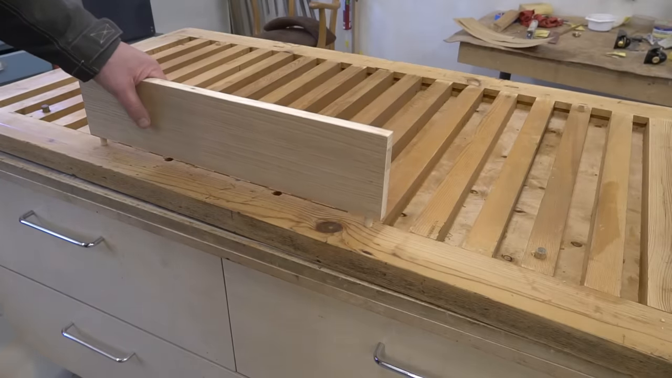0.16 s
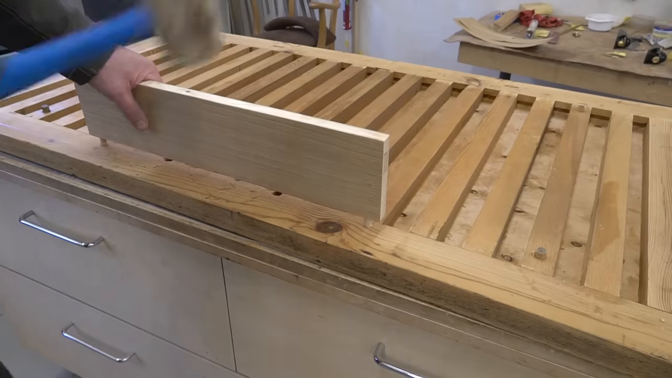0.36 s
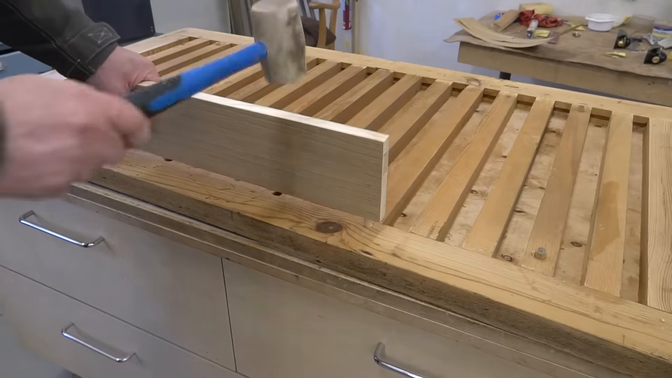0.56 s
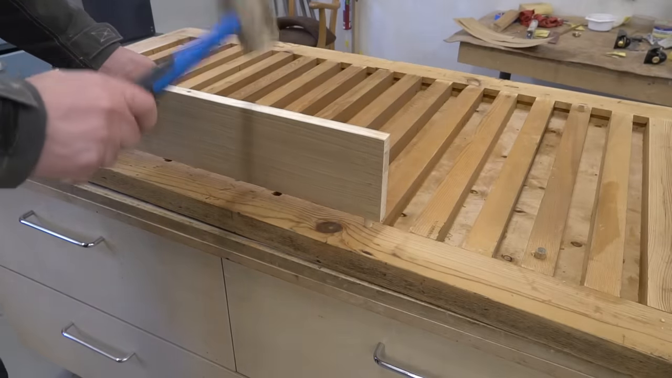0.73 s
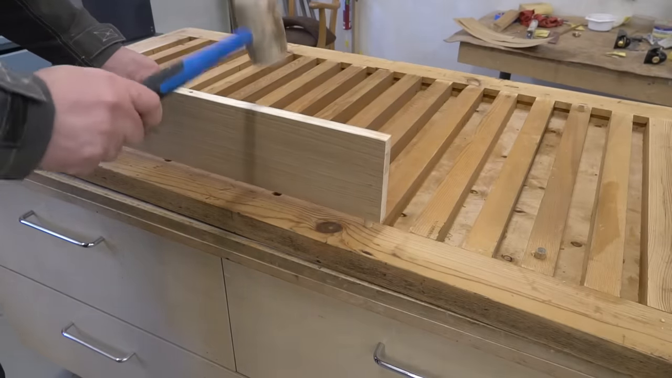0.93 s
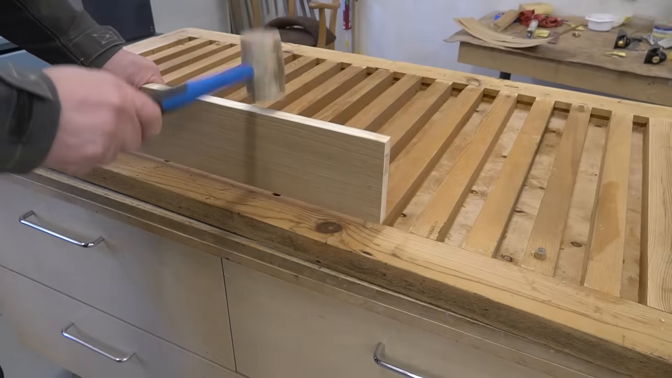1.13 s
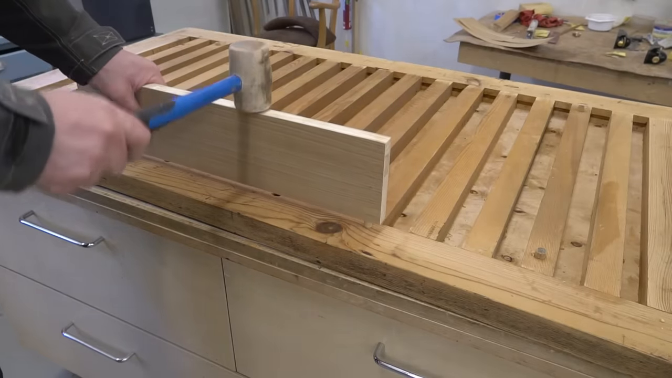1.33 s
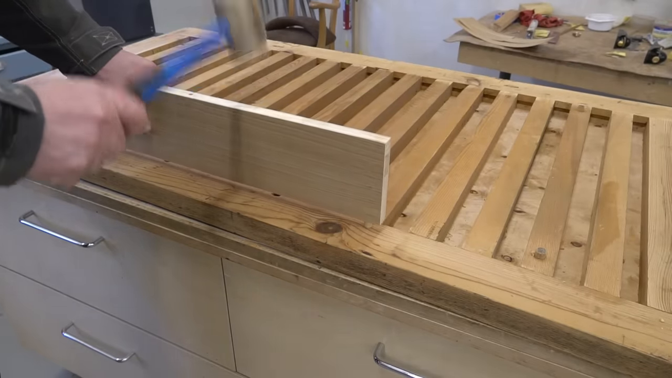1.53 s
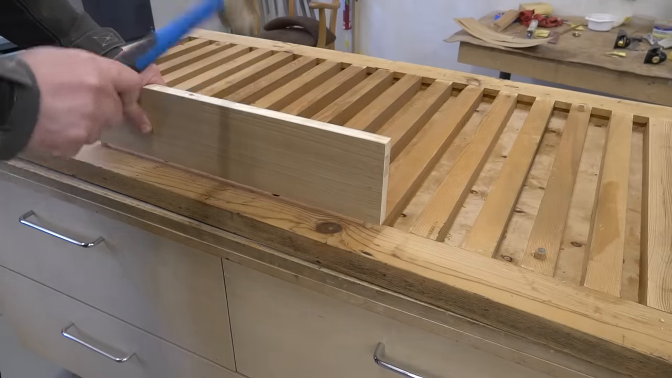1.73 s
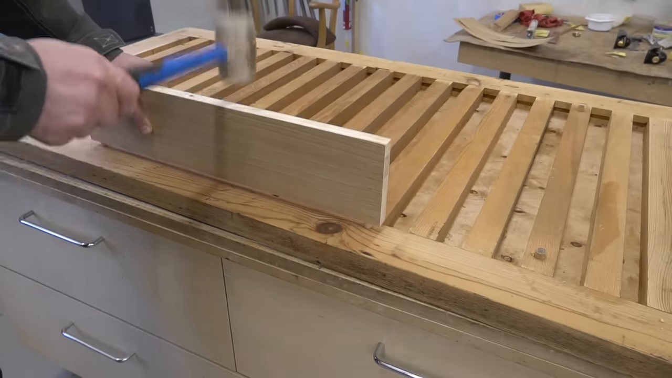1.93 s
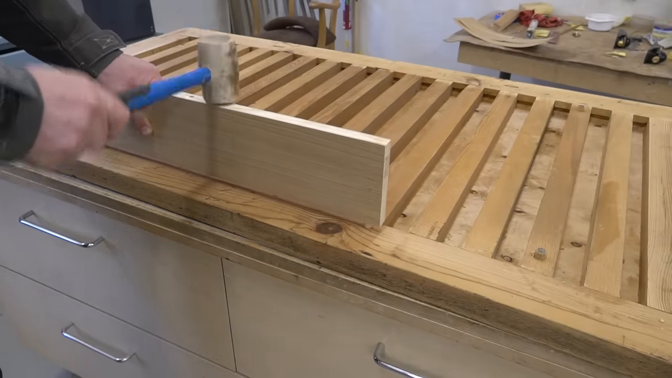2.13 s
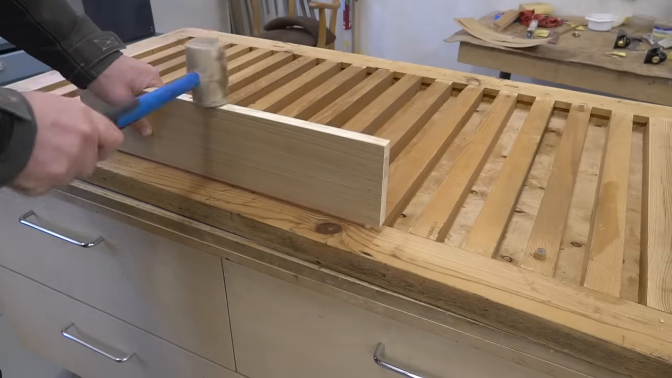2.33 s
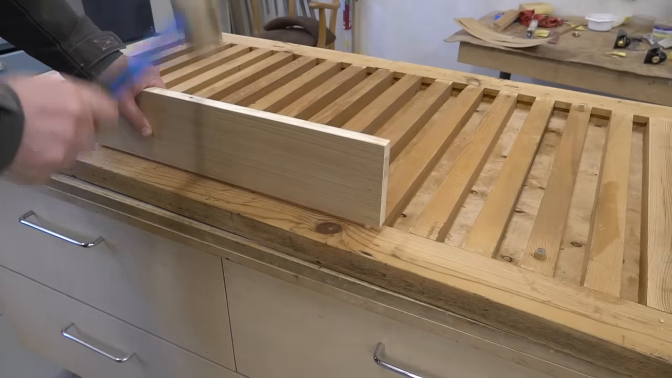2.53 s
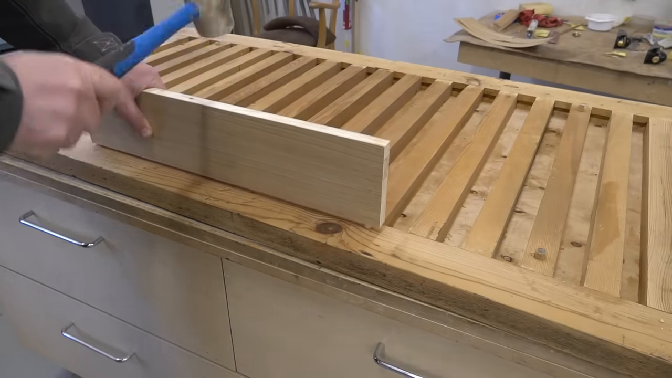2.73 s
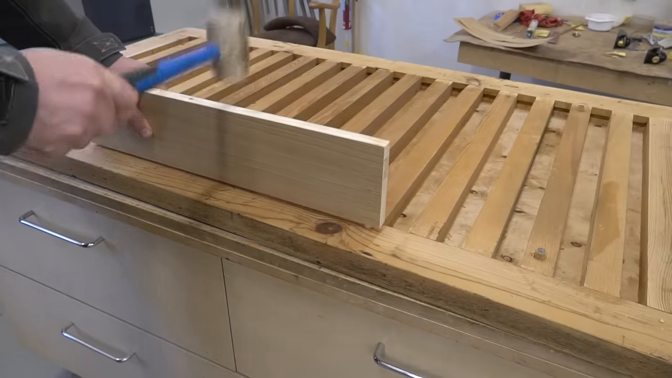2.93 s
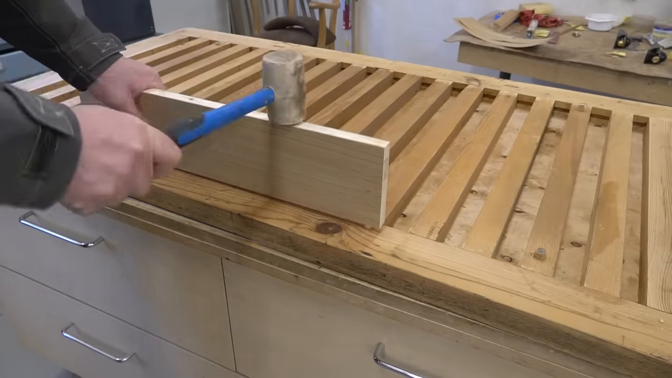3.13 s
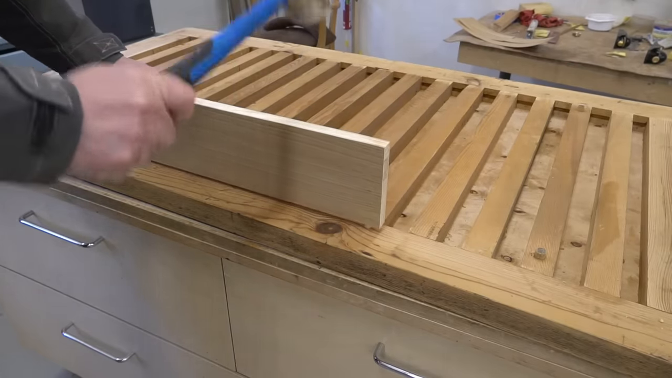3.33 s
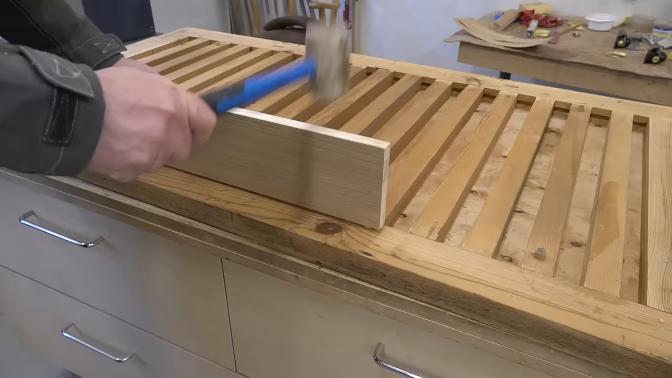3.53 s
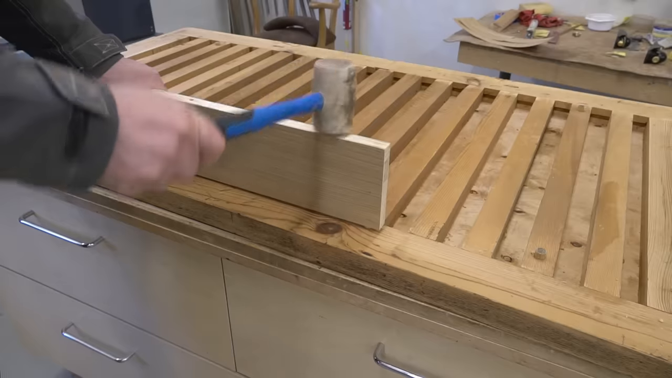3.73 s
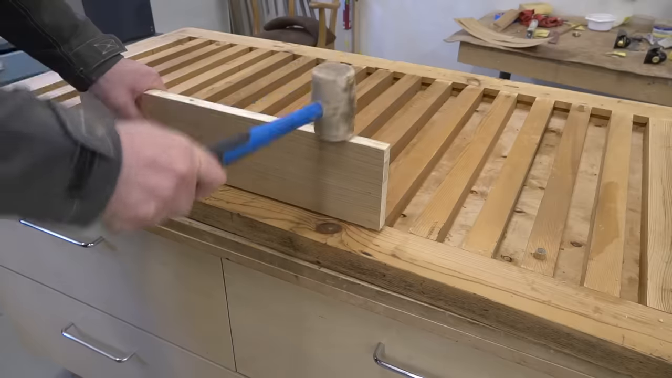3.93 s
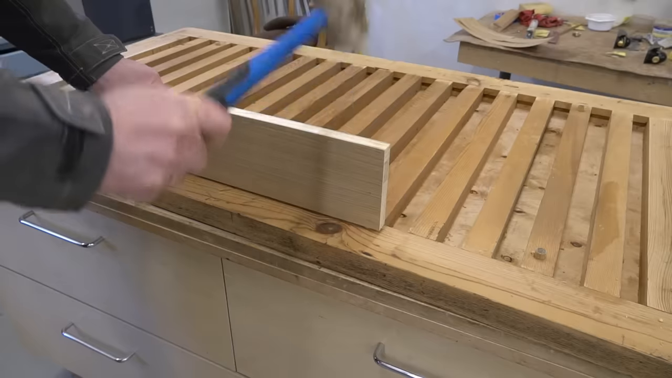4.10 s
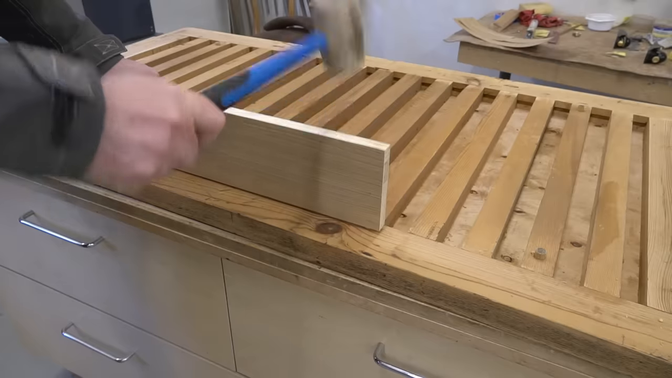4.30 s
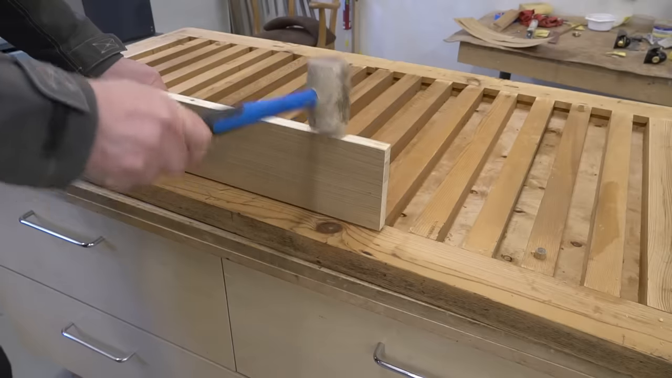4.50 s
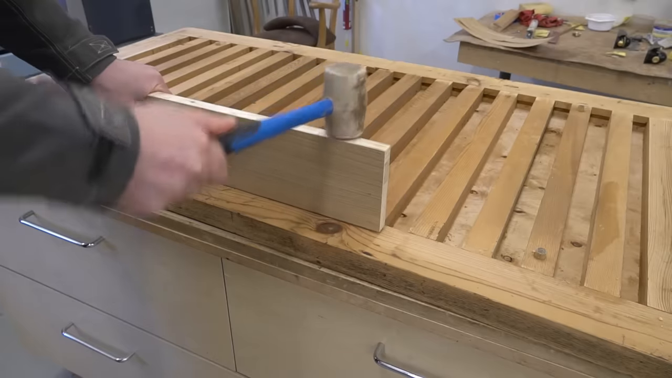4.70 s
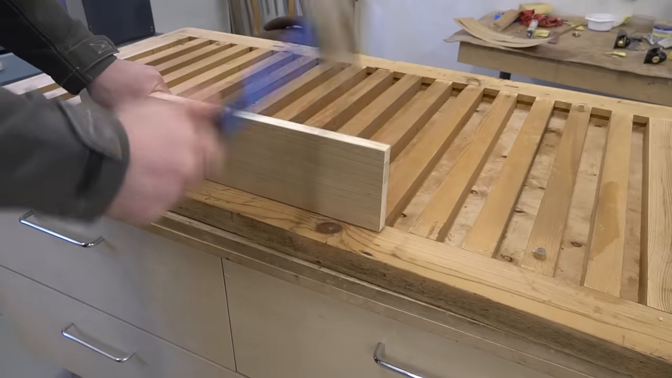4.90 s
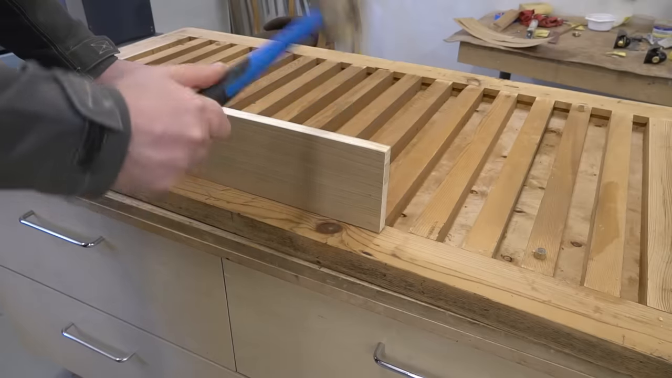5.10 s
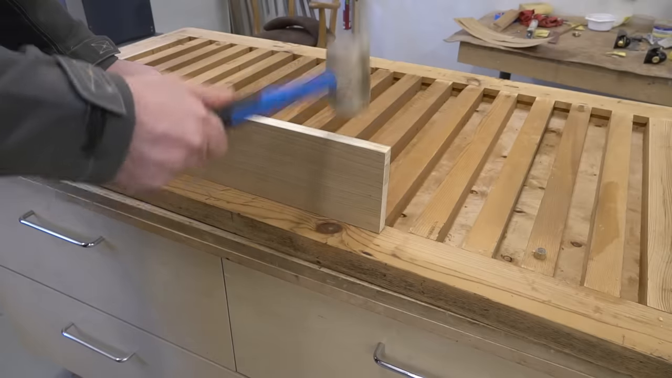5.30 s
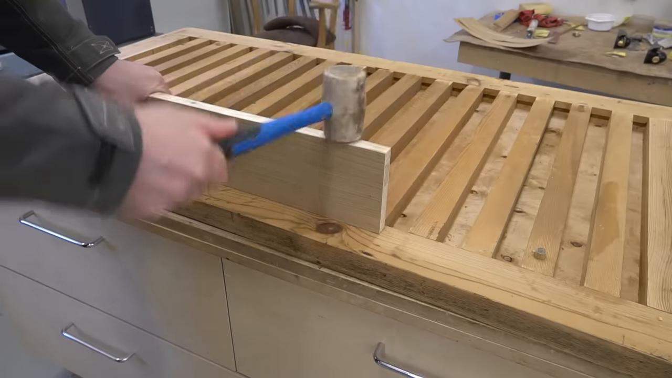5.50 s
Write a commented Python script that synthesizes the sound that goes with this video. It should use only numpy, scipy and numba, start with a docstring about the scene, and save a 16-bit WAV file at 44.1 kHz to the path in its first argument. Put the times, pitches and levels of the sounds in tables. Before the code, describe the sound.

A quiet, live workshop with a barely audible hush. From 0 to 0.5 seconds a stiff sleeve rustles softly, swelling briefly around 0.3, and at 0.53 the board gives a tiny dry tick. At 0.82 a mallet taps the upright board lightly, with a loose, hollow ring. From 1.09 to 2.84 eight firm blows follow about every quarter second near the board's end, each a hard woody crack and knock over a low thud, brightening after 1.75. After a slightly longer gap, ten blows land near the middle from 3.15 to 5.49, fuller and thumpier at first, then tighter, less cracking and strongest from 4.68. The slatted frame rings under each blow and the room tail lasts over half a second, so blows overlap without silence between. Close stereo microphones, nearly centred, slightly right; the loud attacks are squashed and the tails surge up. The final ring is cut off.

```python
"""A mallet drives an upright board down onto its dowels in a wooden frame on a workshop bench: one light tap and eight
blows near the end of the board, then ten near its middle. Each blow layers a noise-burst knock and crack, a thud of
damped sines and a slatted-frame ring, all in a live room of decaying noise. Before them a sleeve rustles as
filtered noise and the board ticks; faint band-passed noise is the room's hush. A limiter ducks the blows."""
import sys
import numpy as np
from scipy import signal
from scipy.fft import rfft, irfft
from scipy.io import wavfile
from numba import njit

SR = 44100
rng = np.random.default_rng(int(sys.argv[2]) if len(sys.argv) > 2 else 0)


def dump_mix(stems):
    """Bounce the given channels to the path in sys.argv[1] as a 16-bit WAV at rate SR."""
    frames = np.atleast_2d(stems).T  # one column per channel
    limited = np.clip(frames, -1, 1)  # hard clip at full scale
    pcm = np.round(limited * 32767).astype(np.int16)
    wavfile.write(sys.argv[1], SR, pcm)


N = 244755

LENGTH = 44100  # samples in one blow with its tail
T = np.arange(LENGTH) / SR
FREQS = np.maximum(np.fft.rfftfreq(LENGTH, 1 / SR), 1)
BLOW_DB = 19.5  # shared level of the blows and the tick, ahead of the limiter
KNOCK_DB, ROOM_DB, CRACK_DB, RING_DB = -6.5, -0.5, -0.5, 2.5  # mix within a blow; the ring is set against the room
MOVE_S = 3.0  # the mallet moves from the end of the board to its middle
# The contact blends (0-1) into a new one between blows at the usual pace, and further after a longer backswing.
PACE_S, SHIFT, SHIFT_PER_S = 0.2504, 0.64, 6.2

# Mallet blows: (time [s], force [dB], extra direct knock of a square hit [dB])
MALLET_BLOWS = [(0.8224, -13.5, 5.5), (1.0872, -3, 1.5), (1.3417, 1, -1.5), (1.6048, 0.5, 2.5),
                (1.8625, 2, 3.5), (2.1156, 1, 5), (2.3618, 0, 0), (2.5997, 1, 1), (2.8376, -0.5, -2.5),
                (3.149, -1.5, 4), (3.4408, -0.5, 1), (3.6973, 0, 2.5), (3.943, 0, 0.5), (4.1929, 0, 0),
                (4.4122, -1.5, 2), (4.6781, 4.5, 0), (4.9689, 5, -11), (5.2302, 3.5, -1.5),
                (5.487, 4.5, -2)]


def mallet(detune=0.0018, seating_db=-15):
    """Blows on one spot sound nearly alike; the sound changes as the mallet wanders and the joint closes."""
    out = np.zeros((2, N))
    paths = contact()
    rings = frame_ring(column=1), frame_ring(column=2)
    bodies = body(column=1), body(column=2)
    edge = causal(crack_contour() + CRACK_DB)
    thud, loose = bench_thud(), loose_board()
    pauses = np.diff([blow[0] for blow in MALLET_BLOWS], prepend=0)
    for number, (s, force_db, square_db) in enumerate(MALLET_BLOWS):
        spot = int(s > MOVE_S)
        shift = np.clip(SHIFT + SHIFT_PER_S * (pauses[number] - PACE_S), 0, 1)
        paths = np.sqrt(1 - shift ** 2) * paths + shift * contact()
        knock, room, crack = rfft(paths)

        # the steadying hand presses a little differently each time and bends the frame's pitch
        pace = 1 + detune * rng.standard_normal()
        bent_ring = np.array([np.interp(T * pace, T, side) for side in rings[spot]])
        ring = undb(ROOM_DB + RING_DB) * rfft(bent_ring)

        struck_wood = (knock * undb(KNOCK_DB + square_db) + room + ring) * bodies[spot]
        # the loose board's ring fades from blow to blow as the dowels grip it
        low_modes = rfft(thud + loose * undb(seating_db * number))
        blow = struck_wood + crack * edge + low_modes
        coloured = irfft(blow * causal(joint_colour(s, force_db)))
        add(out, s, coloured * undb(BLOW_DB + force_db))
    return out


# How the joint answers as it closes: the board clear on its dowels, its end sinking in, first blows on its middle,
# the middle sinking in, then tight on the frame.
# (start time [s], thump [dB], joint resonance at first [Hz], joint resonance level [dB], crack [dB])
JOINT_STAGES = [(0.7, 0.5, 681, 7, 1.4), (1.75, -2.5, 1340, 2, 4), (3.0, 2.5, 860, 3.5, -0.5),
                (3.55, 3, 975, 3.5, 1.5), (4.55, -1.4, 626, 2, -3.5)]
THUMP_PER_FORCE, CRACK_PER_FORCE = -0.37, -0.27  # dB per dB: a harder blow gains less thump and crack than ring
JOINT_RISE_OCTAVES_PER_S = 0.2  # the resonance climbs through each stage as the joint stiffens


def joint_colour(s, force_db, thump_hz=450, crack_hz=2500, joint_octaves=0.18):
    """EQ in dB set by the seat of the board and the mallet's force: low shelf, high shelf and joint peak."""
    since_s, thump_db, joint_hz, joint_db, crack_db = [stage for stage in JOINT_STAGES if stage[0] < s][-1]
    joint_hz = joint_hz * 2 ** (JOINT_RISE_OCTAVES_PER_S * (s - since_s))
    thump_db = thump_db + THUMP_PER_FORCE * force_db
    crack_db = crack_db + CRACK_PER_FORCE * force_db
    low_shelf = thump_db / (1 + (FREQS / thump_hz) ** 4)
    high_shelf = crack_db / (1 + (crack_hz / FREQS) ** 4)
    octaves_away = np.log2(FREQS / joint_hz)
    return low_shelf + high_shelf + joint_db * np.exp(-(octaves_away / joint_octaves) ** 2)


# Nearest surfaces: (delay [s], level [dB], left minus right [dB])
NEAR_ECHOES = [(.0068, -11, -1.5), (0.024, -12.5, -1), (.048, -13.5, -6)]


def contact(soft_hz=3500):
    """What one contact point sends to the microphones: the knock, its room, and the crack."""
    room = undb(ROOM_DB) * reverberation()
    # the nearest surfaces throw back a duller knock
    slap = burst(t60=0.01, rise_s=0.00023, side_db=-35)
    slap = irfft(rfft(slap) / (1 + 1j * FREQS / soft_hz))
    for delay, db, pan_db in NEAR_ECHOES:
        gain = undb(db + np.array([[pan_db], [-pan_db]]) / 2)
        room = room + gain * np.roll(slap, int(delay * SR), axis=1)
    knock = burst(t60=0.1, rise_s=0.00098, side_db=-22)
    crack = burst(t60=0.016, rise_s=0.000073, side_db=-5.0)
    return np.array([knock, room, crack])


def burst(t60, rise_s, side_db):
    """Direct sound: decaying noise stands for crowded, heavily damped wood modes."""
    mid, side = rng.standard_normal((2, LENGTH))
    stereo = mid + np.array([[1], [-1]]) * undb(side_db) * side
    return unit(stereo * fade(t60) * (1 - np.exp(-T / rise_s)))


# Tone of the hard contact of mallet and edge: (frequency [Hz], level [dB])
CRACK_TONE = [(100, -51), (500, -11), (1200, -15.5), (2500, -11), (4500, -19), (7000, -23.5), (11000, -38)]


def crack_contour():
    """Spectrum in dB of hard wood contact, strongest in the mids."""
    return contour(CRACK_TONE, FREQS)


# Short modes, low in the bench top and high in the board: (frequency [Hz], decay t60 [s], level [dB])
THUD_MODES = [(143.2, 0.21, -10.5), (213, 0.23, -4), (2530, 0.15, -39), (4720, 0.017, -12)]


def bench_thud():
    """Damped sines of the bench top and the board."""
    return sum(mode(*row) for row in THUD_MODES)


# The board while it sits loose on the dowel tips: (frequency [Hz], decay t60 [s], level at the first blow [dB])
LOOSE_MODES = [(426, .53, 17), (447, .43, 18), (783, .42, 7), (993, .34, 11), (2393, .13, -5)]


def loose_board():
    """Damped sines of the board ringing freely on the dowel tips."""
    return sum(mode(*row) for row in LOOSE_MODES)


# Long frame rings, relative to the body around them and before their swell:
# (frequency [Hz], struck at the end [dB], struck in the middle [dB])
FRAME_MODES = [(141.5, 8.7, 7.7), (251.5, 9.5, 9.5), (309, 3.3, 3.5), (328.5, 4.5, 4.4), (439, 3.1, 2.2),
               (500.5, 3.1, 1.5), (528, 2.0, 6.0), (610.5, 4.3, 4.6), (655, 3.9, 3.5), (743, 7.4, 5.6),
               (844, 5.8, 1.1), (871, 1.0, 2.6), (935, 5.1, 2.1), (963, 4.9, 2.5), (1001, 2.6, 2.9),
               (1027, 2.3, 3.6), (1072, 2.6, 1.5), (1127, 4.9, -0.3), (1306, 5.3, 2.4), (1361, 3.8, 1.6),
               (1409, 5.1, 3.9), (1541, 5.0, 5.4), (1721, 3.1, 2.8), (1837, 4.2, 5.3), (2160, 4.5, 3.0),
               (2514, 3.9, 3.7)]


def frame_ring(column, t60=0.62, build_s=0.028, apart_hz=2200):
    """The frame's modes swell as the blow spreads through the slats; high ones reach the microphones out of step."""
    ring = 0
    draws = rng.uniform(-1.16, 1, (len(FRAME_MODES), 2))
    for row, (phase, lag) in zip(FRAME_MODES, draws):
        hz, db = row[0], row[column]
        stereo_phase = np.pi * phase + np.array([[lag], [-lag]]) * hz / apart_hz
        ring = ring + mode(hz, t60, db, stereo_phase)
    return ring * (1 - np.exp(-T / build_s))


def mode(hz, t60, db, phase=np.pi / 2):
    """A damped sine whose spectral peak has the given level."""
    peak_scale = 2 * np.log(1000) / (t60 * SR)
    return undb(db) * peak_scale * fade(t60) * np.sin(2 * np.pi * hz * T + phase)


# General slope of board and frame: (frequency [Hz], struck at the end [dB], struck in the middle [dB])
BODY_SLOPE = [(40, -42, -38), (98, -28, -27.5), (139, -19, -18.5), (292, -15.5, -16), (682, -11, -9),
              (1460, -1, -2.5), (2305, -17.5, -10.5), (4540, -16, -14.5), (7080, -24.5, -22),
              (11540, -29.5, -30)]
# Broad peaks on that slope: (frequency [Hz], width [Hz], struck at the end [dB], struck in the middle [dB])
BODY_PEAKS = [(145.5, 46, 7, 3), (250, 63, 5.5, 6), (333.8, 64, 9, 9.5), (424.6, 108, 5, 8),
              (502.7, 106, 10.5, 11.5), (636, 104, 6, 5.5), (840, 130, 5.5, 4), (984, 288, 6, 6),
              (1110, 118, 4, 3), (1307, 86, 1, 4), (1314, 28, 4, 1), (1494, 310, 4, -0.5),
              (1824, 490, 3.5, 4), (2554, 218, 11, 5), (3200, 1200, 1, -2.5)]


def body(column):
    """Filter of board and frame for one striking spot: broad resonances on a general slope."""
    peaks = 0
    for hz, width, *dbs in BODY_PEAKS:
        peaks = peaks + dbs[column - 1] / (1 + (2 * (FREQS - hz) / width) ** 2)
    return causal(contour(BODY_SLOPE, FREQS, axis=column) + peaks)


# Decay of the room: (frequency [Hz], decay t60 [s])
ROOM_DECAY = [(120, 0.69), (350, 0.75), (800, 0.73), (1600, 0.68), (3500, 0.58), (6000, 0.53),
              (10000, 0.39)]


def reverberation(build_s=0.021):
    """Dense reflections that build up, then die away sooner in the treble."""
    noise, tail = diffuse(LENGTH), 0
    centres, t60s = np.transpose(ROOM_DECAY)
    # each row of the identity picks one band, crossfading into its neighbours
    for share, t60 in zip(np.eye(len(centres)), t60s):
        band = np.interp(np.log(FREQS), np.log(centres), share)
        tail = tail + irfft(noise * band) * fade(t60)
    return unit(tail * (1 - np.exp(-T / build_s)))


# How far diffuse sound differs between the two microphones: (frequency [Hz], side minus mid [dB])
DIFFUSE_SIDE = [(100, -22), (330, -21), (620, -13), (1100, -8), (2000, -7), (3500, -3), (6500, -1.5),
                (11000, -0.5)]


def diffuse(size):
    """Spectrum of noise from all sides: alike at both microphones in the bass, nearly unrelated in the treble."""
    mid, side = rfft(rng.standard_normal((2, size)))
    freqs = np.maximum(np.fft.rfftfreq(size, 1 / SR), 1)
    width = undb(contour(DIFFUSE_SIDE, freqs))
    return (mid + np.array([[1], [-1]]) * width * side) / np.sqrt(1 + width ** 2)


# Tone of the cloth before its treble lift: (frequency [Hz], level [dB])
CLOTH_TONE = [(35, -84), (60, -53), (232, -32), (896, -6.5), (2050, -1), (2290, -4.5), (2500, -3.5),
              (3240, -5.5), (4400, -10.5), (6960, -15), (11000, -19), (14300, -52), (22000, -120)]
# Swings of the sleeved arm: (time [s], hold length [s], level before grain and treble lift [dB])
ARM_SWINGS = [(0.0, 0.016, -52.5), (0.273, 0.087, -52)]
SWISH_PER_LEVEL = 0.25  # dB of treble lost per dB of level: a slow arm rustles duller


def sleeve(grain_db=1.0, grain_rate=160, swish_hz=4000, swish_db=8):
    """Stiff cloth rubs in tiny slips: filtered noise with a random level flutter, brighter when louder."""
    t = np.arange(N) / SR
    freqs = np.maximum(np.fft.rfftfreq(N, 1 / SR), 1)
    level_db = np.max([swing(t, *row) for row in ARM_SWINGS], axis=0)
    bright_db = SWISH_PER_LEVEL * (level_db - level_db.max())
    rub = diffuse(N) * undb(contour(CLOTH_TONE, freqs))
    treble = 1 / (1 + (swish_hz / freqs) ** 4)
    dull = irfft(rub * (1 - treble), N)
    swish = irfft(rub * treble, N) * undb(bright_db + swish_db)
    # grain_rate new random levels a second, joined by straight lines
    slips_db = grain_db * np.interp(t * grain_rate, np.arange(N), rng.standard_normal(N))
    return (dull + swish) / irfft(rub, N).std() * undb(level_db + slips_db)


def swing(t, s, length_s, db, rise_db_per_s=111, fall_db_per_s=58):
    """Level of one swing of the arm in dB: it rises, holds and falls."""
    before_s = np.maximum(s - t, 0)
    after_s = np.maximum(t - s - length_s, 0)
    return db - rise_db_per_s * before_s - fall_db_per_s * after_s


def board_tick(tick_s=0.526, tick_db=-28):
    """The board ticks on its dowels under the steadying hand: a short burst with some room; level against a blow."""
    out = np.zeros((2, N))
    tick = burst(t60=0.014, rise_s=0.00089, side_db=2) + reverberation() / 2
    coloured = irfft(rfft(tick) * causal(crack_contour()))
    add(out, tick_s, coloured * undb(BLOW_DB + tick_db))
    return out


def room_air(air_db=-70):
    """The faint hush of the workshop: diffuse noise through a 600-3000 Hz band."""
    band = signal.butter(2, [600, 3000], "band", fs=SR, output="sos")
    air = signal.sosfilt(band, irfft(diffuse(N), N))
    return air / air.std() * undb(air_db)


def undb(db):
    """Decibels to gain."""
    return 10 ** (np.asarray(db) / 20)


def contour(points, freqs, axis=1):
    """A column of a table of (frequency [Hz], ..) rows, joined on a log-frequency axis."""
    points = np.array(points)
    return np.interp(np.log(freqs), np.log(points[:, 0]), points[:, axis])


def causal(db):
    """The minimum-phase filter with this gain in dB: it rings only after the blow."""
    cepstrum = irfft(db * np.log(10) / 20)
    cepstrum[1:LENGTH // 2] *= 2
    cepstrum[LENGTH // 2 + 1:] = 0
    return np.exp(rfft(cepstrum))


def fade(t60):
    """Exponential decay by 60 dB in t60 seconds."""
    return np.exp(-np.log(1000) * T / t60)


def unit(x):
    """Scale to unit energy a channel, on average."""
    return x / np.sqrt(np.mean(np.sum(x ** 2, axis=-1)))


def add(out, s, sound):
    """Mix a sound in at a time in seconds."""
    start = int(s * SR)
    out[:, start:start + LENGTH] += sound[:, :N - start]


def scene(pan_db=-0.7):
    """All layers together, leaning a little to the right (left minus right in dB)."""
    layers = mallet() + sleeve() + board_tick() + room_air()
    return layers * undb(np.array([[pan_db], [-pan_db]]) / 2)


@njit
def follow(x, attack, release):
    """Envelope that rises quickly and falls slowly."""
    env, e = np.empty(len(x)), 0.
    for i in range(len(x)):
        e += (x[i] - e) * (attack if x[i] > e else release)
        env[i] = e
    return env


def record(dry, threshold_db=-16.0, attack_s=0.00026, release_s=0.058, slope=0.69, ceiling_db=-8, top_hz=11050):
    """A limiter ducks each blow and recovers during its tail; peaks are rounded and the top is cut."""
    # the microphones are deaf to deep bass
    dry = signal.sosfilt(signal.butter(2, 62, "high", fs=SR, output="sos"), dry)
    attack, release = 1 - np.exp(-1 / (attack_s * SR)), 1 - np.exp(-1 / (release_s * SR))
    env = follow(np.abs(dry).max(axis=0), attack, release)
    # slope: dB of ducking per dB over the threshold
    limited = dry * np.maximum(env / undb(threshold_db), 1) ** -slope
    rounded = undb(ceiling_db) * np.tanh(limited / undb(ceiling_db))
    top_cut = signal.ellip(10, .2, 80, top_hz, fs=SR, output="sos")
    return signal.sosfilt(top_cut, rounded)


dry = scene()
out = record(dry)
dump_mix(out)
```